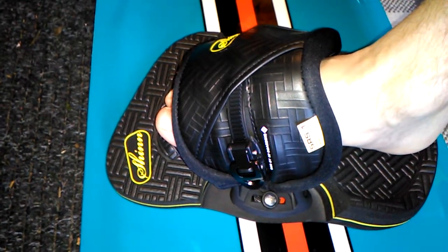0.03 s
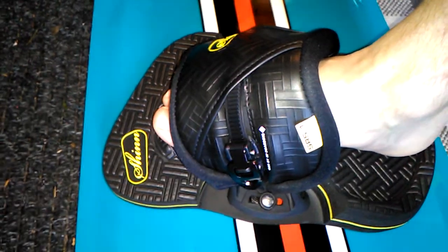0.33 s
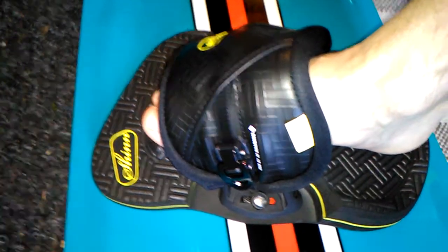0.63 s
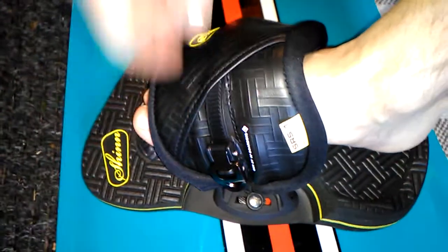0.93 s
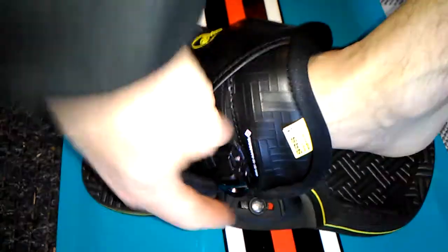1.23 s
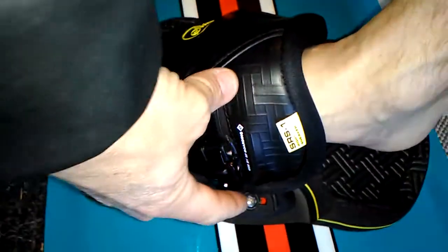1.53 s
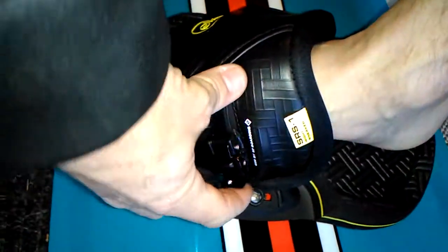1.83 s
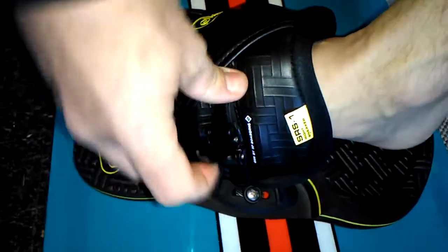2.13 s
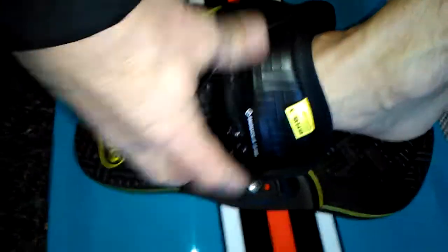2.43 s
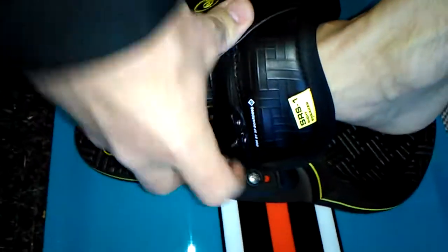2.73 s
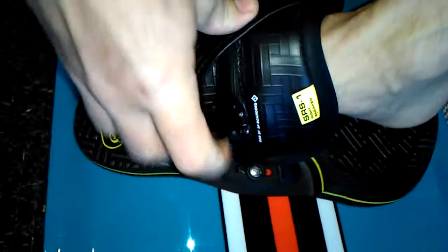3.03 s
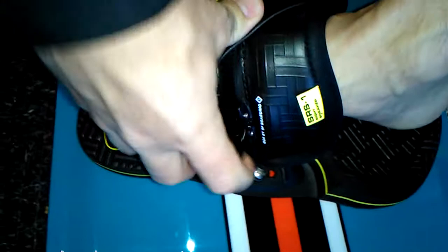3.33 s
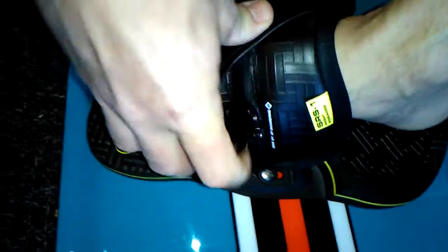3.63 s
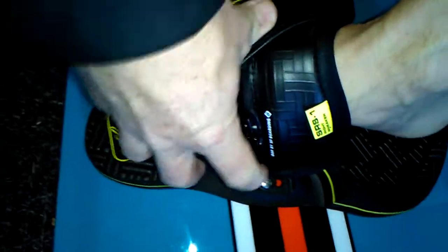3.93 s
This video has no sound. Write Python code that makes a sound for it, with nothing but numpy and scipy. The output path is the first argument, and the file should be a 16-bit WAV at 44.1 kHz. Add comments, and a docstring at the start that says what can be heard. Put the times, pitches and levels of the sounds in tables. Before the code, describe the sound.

Close clicks and hard snaps of a ratchet buckle cinching a creaky foot strap.

```python
"""The plastic ratchet buckle of a foot strap, tightened by hand, close up in a small room.
Swinging the lever back clicks its pawl. Pushing it takes up slack with dull knocks and drags the
toothed strap on, creaking, until the catch snaps over a tooth and thumps the board. Underneath,
a sleeve rustles over soft hiss, and a hand-held camera rumbles and gives two dry ticks."""
import sys
import numpy as np
from scipy import signal
from scipy.fft import rfft, irfft
from scipy.io import wavfile
from scipy.ndimage import uniform_filter1d

SR = 44100
rng = np.random.default_rng(int(sys.argv[2]) if len(sys.argv) > 2 else 0)


def dump(signal):
    """Clip the signal to [-1, 1] and save it as 16-bit WAV at the path in sys.argv[1]."""
    limited = np.clip(np.atleast_2d(signal).T, -1, 1)
    pcm = np.round(limited * 32767).astype(np.int16)
    wavfile.write(sys.argv[1], SR, pcm)


N = 176400

# The room's short decay. Each row: frequency in Hz, nominal seconds to fall 60 dB.
ROOM_DECAY = [(250, 0.26), (700, 0.14), (2000, .16), (9000, 0.14)]
# Stereo width, narrow in the bass. Each row: frequency in Hz, left-right correlation.
STEREO_LIKENESS = [(100, 0.85), (300, 0.86), (650, 0.64), (1200, 0), (12000, -0.0456)]
# Where the buckle sits in the image. Each row: frequency in Hz, left minus right in dB.
BUCKLE_PAN = [(100, -0.5), (700, -1.5), (1300, 3), (2400, -0.5), (4400, -0.5), (8100, -6)]

# Tone of the hiss, the rumble and the cloth. Each row: frequency in Hz, relative level in dB.
HISS_TONE = [(120, 0), (500, -7.5), (1100, -9), (2200, -10), (5500, -14.5), (9000, -10.5), (14000, -14)]
RUMBLE_TONE = [(8, -0.5), (15, -8.5), (30, -18.5), (60, -28), (120, -40), (220, -49.5), (600, -77)]
SLEEVE_TONE = [(150, -10), (950, 1), (1500, -2), (2300, -0.5), (3300, -10.5), (4600, -5.5), (6200, -10.5),
               (14000, -14.5)]
SWISH_TONE = [(300, -37), (750, -2.5), (2200, 4), (3500, -10), (5200, -4.5), (8000, -18)]
# Fader rides for rumble and sleeve. Each row: time in seconds, relative level in dB.
RUMBLE_RIDE = [(0, -52.5), (.42, -60), (.9, -47), (1.85, -50.5), (2.5, -40), (3.42, -42.5), (3.6, -37),
               (4, -43.5)]
SLEEVE_RIDE = [(.42, -80), (.5, -59), (1.25, -52), (1.62, -53.5), (1.75, -65.5), (2, -62.5), (2.35, -50.5),
               (2.75, -56), (3.35, -52.5), (4, -59)]
# The sleeve slides as the arm reaches in. Each row: peak time and half-length in seconds,
# level in dB, band centre in Hz.
SLEEVE_SLIDES = [(.87, 0.078, -62.5, 2280), (1.47, 0.16, -60, 4280)]
# One quick swish of cloth: peak time and half-length in seconds, level in dB.
CLOTH_SWISH = (0.58, 0.034, -43)

# EQ curves for the camera's and the buckle's hits. Each row: frequency in Hz, relative gain in dB.
TICK_EQ = [(250, -21), (450, 3), (850, -1.5), (1400, -9.5), (2500, -1.5), (4200, -6), (7000, -8),
           (13000, -4)]
THUMP_EQ = [(20, -9), (55, -2.5), (120, -7), (250, -26), (700, -48), (2000, -76)]
CREAK_EQ = [(100, -10.5), (300, -8), (760, 4), (1200, -15.5), (4000, -16.5), (14000, -30.5)]
KNOCK_EQ = [(80, -15.5), (250, -4.5), (650, -1.5), (1100, -8.5), (1800, -7.5), (3500, -26.5),
            (14000, -39.5)]
CLICK_EQ = [(100, -10), (330, -14), (700, -1), (1500, -5), (3500, -1.5), (6000, -0.5), (10000, -0.5),
            (14000, -11.5)]
SNAP_EQ = [(100, -18), (200, -19.5), (480, -3), (690, -3.5), (950, -7), (1900, -7), (3300, -14.5),
           (4800, -7.5), (6200, -19.5), (8200, -14.5), (11000, -24), (14000, -26.5)]

# Ticks at the camera. Each row: start in seconds, tick gain in dB, thump gain in dB.
CAMERA_TICKS = [(0.2933, 4, -33.5), (3.4232, -16.5, -20)]
# The strap under load. Each row: start and end in seconds, relative level it builds to in dB.
STRAP_CREAKS = [(2.148, 2.257, -4.5), (2.305, 2.37, -3.5), (2.465, 2.55, 7.5), (2.737, 2.823, -2),
                (2.844, 2.924, 11), (2.982, 3.031, 0.5), (3.15, 3.243, 4.5), (3.399, 3.505, 9),
                (3.71, 3.8, 1)]
# Lever and strap taking up slack. Each row: start in seconds, relative level in dB,
# tilt in dB per octave, the lever's note in Hz.
SLACK_KNOCKS = [(1.618, -18, 3.5, 2070), (2.097, 2.5, -1.5, 637), (2.268, 1, -5, 527),
                (2.486, -7, -0.5, 494), (2.506, -3.5, 1, 1440), (2.531, -3, 2.5, 1620),
                (2.545, -1, 2.5, 515), (2.800, -18.5, 7, 854), (2.818, -7, -7.5, 530), (2.853, -4, -5, 524),
                (2.895, -0.5, -0.5, 1140), (3.1578, 0.5, 4, 1660), (3.208, -3, 0, 640),
                (3.416, -3, -1.5, 660), (3.438, -4, -5, 487), (3.4658, 7.5, -.5, 780),
                (3.7098, 4.5, 0, 1680), (3.752, -8, -2.5, 667), (3.784, 0, -7, 1840)]
# Light clicks of the pawl. Each row: start in seconds, relative level in dB, lower resonance in Hz,
# its boost in dB, upper resonance in Hz, its boost in dB, notch in Hz.
PAWL_CLICKS = [(2.1325, -5, 3880, 6.5, 9900, 4.5, 8600), (2.2510, -4.5, 5540, 6, 12630, 10, 9550),
               (2.922, -4, 6550, 5, 11000, 3.5, 12050), (3.4927, -4, 5770, 6.5, 8240, 5, 10260)]
# What a snap sets ringing in board and buckle. Each row: pitch in Hz, relative level in dB,
# seconds to fall 60 dB.
BOARD_MODES = [(268.6, 0, 0.09), (360.4, -5, 0.2), (484.6, 5, 0.14), (541.6, 1.5, 0.15),
               (619.4, 8.5, 0.089), (667.6, 6, 0.087), (796, 8.5, 0.063), (1006, -18, 0.28),
               (1218, -27, 0.11), (1397, 1.5, 0.081), (1620, -6, 0.17), (2065, -4, 0.14), (2330, -1, 0.15)]
# Heavy snaps of the catch. Each row: start in seconds, relative level in dB, delay of the second hit
# in seconds, its offset in dB, ping pitch in Hz, its relative level in dB.
CATCH_SNAPS = [(2.554, -4, 0.0049, 0.5, 4570, -20), (3.2334, -3, 0.0044, -0.5, 4755, 4),
               (3.7907, -4, .0038, 1, 4820, 2.5)]


def amp(db):
    """Decibels to gain."""
    return 10 ** (np.asarray(db) / 20)


def unit_rms(x):
    """Scales to rms 1."""
    return x / np.sqrt(np.mean(x ** 2) + 1e-20)


def curve(points, hz):
    """Reads a table on a log-frequency axis."""
    f, value = np.transpose(points)
    return np.interp(np.log(hz + 1), np.log(f + 1), value)


def fader(points):
    """Gain over time from (seconds, dB) points."""
    return amp(np.interp(np.arange(N) / SR, *np.transpose(points)))


def bell(hz, centre_hz, width_hz):
    """Shape of one resonance, 1 at its centre."""
    return 1 / (1 + ((hz - centre_hz) / width_hz) ** 2)


def stereo_noise(size):
    """White noise, partly shared by left and right."""
    shared, own = rfft(rng.standard_normal((2, size)))
    likeness = np.clip(curve(STEREO_LIKENESS, np.fft.rfftfreq(size, 1 / SR)), -1, 1)
    return irfft(np.array([shared, likeness * shared + np.sqrt(1 - likeness ** 2) * own]), size)


def noise_bed(tone):
    """Steady stereo noise with the given tone."""
    gain = amp(curve(tone, np.fft.rfftfreq(N, 1 / SR)))
    return unit_rms(irfft(rfft(stereo_noise(N)) * gain, N))


def eq(x, points, extra_db=lambda hz: 0, size=4096):
    """Minimum-phase EQ that also pans each band to the buckle's place."""
    hz = abs(np.fft.fftfreq(size, 1 / SR))
    pan_db = np.outer([.5, -.5], curve(BUCKLE_PAN, hz))
    gain = unit_rms(amp(curve(points, hz))) * amp(extra_db(hz) + pan_db)
    log_response = np.conj(signal.hilbert(np.log(gain + 1e-7)))
    taps = np.fft.ifft(np.exp(log_response)).real
    return signal.fftconvolve(x, taps[:, :size // 2], axes=1)[:, :x.shape[1]]


def strike(crack_s, tail_db, impact_db=-20, hold_s=0.0038, rise_s=0.00045, impact_s=0.00085, size=12000):
    """A hard impact, a crack of plastic, then rattling reflections that hold and die band by band."""
    t = np.arange(size) / SR
    hz, frame_s, bands = signal.stft(stereo_noise(size), SR, nperseg=128)
    age = np.hypot(frame_s, hold_s) - hold_s
    t60 = 0.9 * curve(ROOM_DECAY, hz)[:, None]
    tail = signal.istft(bands * amp(-60 * age / t60), SR, nperseg=128)[1][:, :size]
    crack = np.exp(-t / crack_s)
    rattle_db = 2 * unit_rms(uniform_filter1d(rng.standard_normal(size), size=60))
    impact = amp(impact_db) * stereo_noise(size) * np.exp(-t / impact_s)
    body = stereo_noise(size) * crack + amp(tail_db) * tail * np.sqrt(1 - crack ** 2)
    return impact + (1 - np.exp(-t / rise_s)) * unit_rms(amp(rattle_db)) * body


def ring(hz, t60, rise_s=0.00056):
    """One dying resonance, reaching left and right out of step."""
    t = np.arange(SR // 3) / SR
    spread = np.arccos(np.clip(curve(STEREO_LIKENESS, hz), -1, 1))
    offset = spread * np.array([[0], [rng.choice([-1, 1])]])
    tone = np.sin(2 * np.pi * (hz * t + rng.random()) + offset)
    return tone * (1 - np.exp(-t / rise_s)) * amp(-60 * t / t60)


def place(mix, start, sound):
    """Mixes a stereo sound in at start seconds."""
    part = mix[:, round(start * SR):][:, :sound.shape[1]]
    part += sound[:, :part.shape[1]]


def hiss(level_db=-56.5):
    """A faint, even hiss under everything."""
    return amp(level_db) * noise_bed(HISS_TONE)


def camera_rumble(gain_db=17):
    """Deep handling noise of the hand-held camera."""
    return amp(gain_db) * fader(RUMBLE_RIDE) * noise_bed(RUMBLE_TONE)


def cloth_stroke(peak_s, half_s, db):
    """Swell and fade of one stroke of cloth."""
    return amp(db) / (1 + abs((np.arange(N) / SR - peak_s) / half_s) ** 5)


def sleeve(scuff_db=2, scuff_hz=29.6, slide_width_hz=600):
    """Cloth scuffs unevenly as the arm moves: two slides, a soft rustle and a quick swish."""
    hz = np.fft.rfftfreq(N, 1 / SR)
    flutter = lambda: amp(scuff_db * unit_rms(irfft(rfft(rng.standard_normal(N)) * (hz < scuff_hz), N)))
    slides = 0
    for peak_s, half_s, db, centre_hz in SLEEVE_SLIDES:
        envelope = cloth_stroke(peak_s, half_s, db) * flutter()
        band = irfft(rfft(stereo_noise(N)) * bell(hz, centre_hz, slide_width_hz), N)
        slides += envelope * unit_rms(band)
    rustle = fader(SLEEVE_RIDE) * flutter() * noise_bed(SLEEVE_TONE)
    swish = cloth_stroke(*CLOTH_SWISH) * noise_bed(SWISH_TONE)
    return slides + rustle + swish


def camera_ticks(thump_s=0.0068, rattle_s=0.0019, rattle_db=-24, size=4096):
    """Dry ticks right at the camera, with a low thump through its case."""
    out, t = np.zeros((2, N)), np.arange(size) / SR
    centred = lambda hz: np.outer([-.5, .5], curve(BUCKLE_PAN, hz))  # cancels the pan in eq()
    for start, db, thump_db in CAMERA_TICKS:
        tick = (t == 0) + amp(rattle_db) * stereo_noise(size) * np.exp(-t / rattle_s)
        thump = stereo_noise(size) * np.exp(-t / thump_s)
        place(out, start, amp(db) * eq(tick, TICK_EQ, centred))
        place(out, start, amp(thump_db) * eq(thump, THUMP_EQ, centred))
    return out


def strap_creaks(slips_per_s=450, spread_db=4, gain_db=-40, build_db=8, fade_s=0.0081, variants=8):
    """The strap sticks and slips in tiny uneven steps, louder as the load builds."""
    t = np.arange(N) / SR
    slipping = rng.random(N) < slips_per_s / SR
    strength = amp(spread_db * np.minimum(rng.exponential(1, N), 3))
    slips = unit_rms(slipping * strength * rng.choice([-1, 1], N))
    load, creak = 0, 0
    for start, end, db in STRAP_CREAKS:
        remaining = np.clip((end - t) / (end - start), 0, 1)
        gate = np.clip(np.minimum(t - start, end - t) / fade_s, 0, 1)
        load += amp(db - build_db * remaining) * gate
    variant = rng.integers(0, variants, N)  # each slip fires one of a few tiny cracks
    for k in range(variants):
        crack = strike(crack_s=0.00035, tail_db=-19.5)
        triggers = slips * load * (variant == k)
        creak += signal.fftconvolve(triggers[None], crack / np.linalg.norm(crack[0]), axes=1)[:, :N]
    return amp(gain_db) * eq(creak, CREAK_EQ)


def slack_knocks(gain_db=-19, ring_cycles=18):
    """Dull knocks of the strap ring the lever at a note set by the grip; hard knocks ring more."""
    out = np.zeros((2, N))
    for start, db, tilt, note_hz in SLACK_KNOCKS:
        tilt_db = lambda hz: tilt * np.log2(np.maximum(hz, 400) / 700)
        knock = eq(strike(crack_s=0.002, tail_db=-16.5, impact_db=-3.5), KNOCK_EQ, tilt_db)
        lever = amp(-3 + .5 * max(db, 0)) * ring(note_hz, ring_cycles / note_hz)
        for layer in knock, lever:
            place(out, start, amp(db + gain_db) * layer)
    return out


def pawl_clicks(gain_db=-3.5, width_hz=380, ripple_db=-2, notch_db=-11):
    """Bright clicks; the grip shifts the lever's small treble resonances, boosts two and mutes one."""
    out, ripple_hz = np.zeros((2, N)), np.linspace(1500, SR / 2, num=120)
    for start, db, low_hz, low_db, high_hz, high_db, notch_hz in PAWL_CLICKS:
        ripple = ripple_db * np.sin(2 * np.pi * rng.random(len(ripple_hz)))
        grip_db = lambda hz: (low_db * bell(hz, low_hz, width_hz)
                              + high_db * bell(hz, high_hz, width_hz)
                              + notch_db * bell(hz, notch_hz, width_hz)
                              + np.interp(hz, ripple_hz, ripple, left=0))
        click = strike(crack_s=0.0051, tail_db=-8.5, impact_db=2, hold_s=0.0068)
        place(out, start, amp(db + gain_db) * eq(click, CLICK_EQ, grip_db))
    return out


def catch_snaps(crack_db=-7, body_db=-11, ping_gain_db=-4, ping_split=0.066, board_db=-12.5):
    """The catch drops over a tooth and pings, the strap slams back against it, and the board rings."""
    out = np.zeros((2, N))
    for start, db, delay, second_db, ping_hz, ping_db in CATCH_SNAPS:
        for at, hit_db in (start, db), (start + delay, db + second_db):
            crack = eq(strike(crack_s=0.0007, tail_db=-11.5, impact_db=5), CLICK_EQ)
            body = eq(strike(crack_s=0.005, tail_db=3.5, hold_s=0.0088), SNAP_EQ)
            place(out, at, amp(hit_db + crack_db) * crack + amp(hit_db + body_db) * body)
        for hz in ping_hz * (1 - ping_split / 2), ping_hz * (1 + ping_split / 2):
            place(out, start, amp(db + ping_db + ping_gain_db) * ring(hz, t60=0.028))
        for hz, mode_db, t60 in BOARD_MODES:
            place(out, start, amp(db + mode_db + board_db) * ring(hz, t60, rise_s=0.0045))
    return out


def scene():
    """The buckle up front; camera, sleeve and hiss behind it."""
    buckle = pawl_clicks() + catch_snaps() + slack_knocks() + strap_creaks()
    return buckle + camera_ticks() + sleeve() + hiss() + camera_rumble()


def record(dry, limit_db=-5, release_db_per_s=600, ceiling=.88, cutoff_hz=14500):
    """A fast limiter holds the snaps, peaks saturate, and a low-pass trims the top."""
    power_db = 10 * np.log10(abs(uniform_filter1d((dry ** 2).mean(0), size=100)) + 1e-12)
    release = np.arange(N) * release_db_per_s / SR
    held_db = np.maximum.accumulate(power_db + release) - release
    reduction_db = uniform_filter1d(np.maximum(held_db - limit_db, 0), size=40)
    saturated = ceiling * np.tanh(dry / ceiling / amp(reduction_db))
    lowpass = signal.firwin(201, cutoff_hz, window=("kaiser", 8), fs=SR)
    return signal.oaconvolve(saturated, lowpass[None], "same")


dry = scene()
out = record(dry)
dump(out)
```